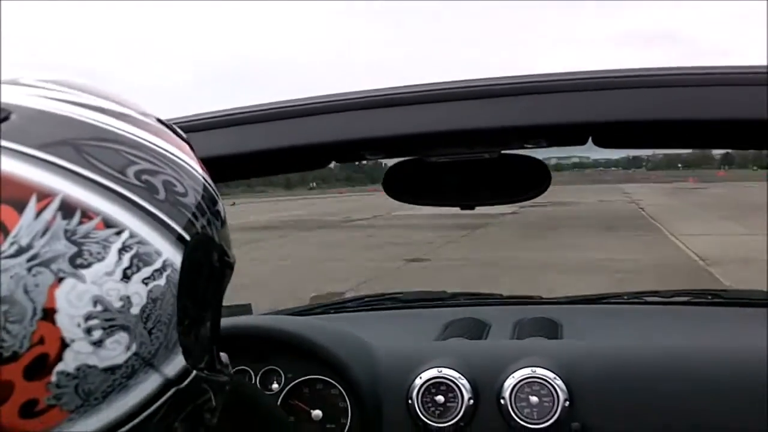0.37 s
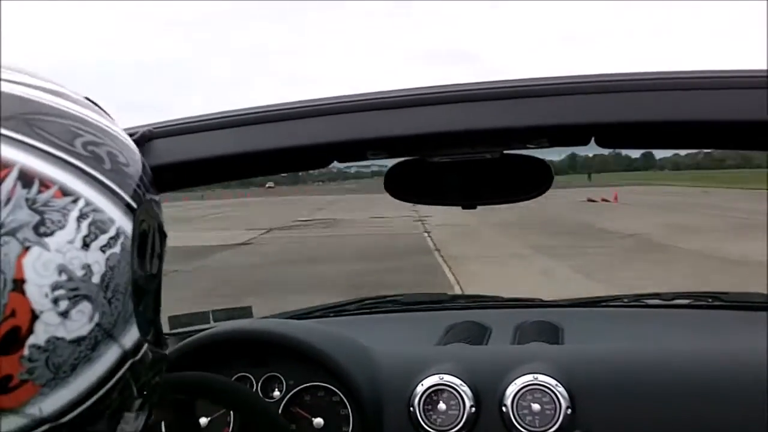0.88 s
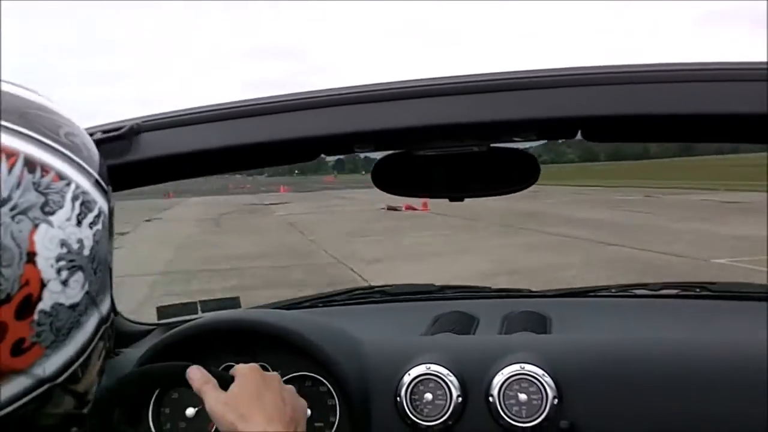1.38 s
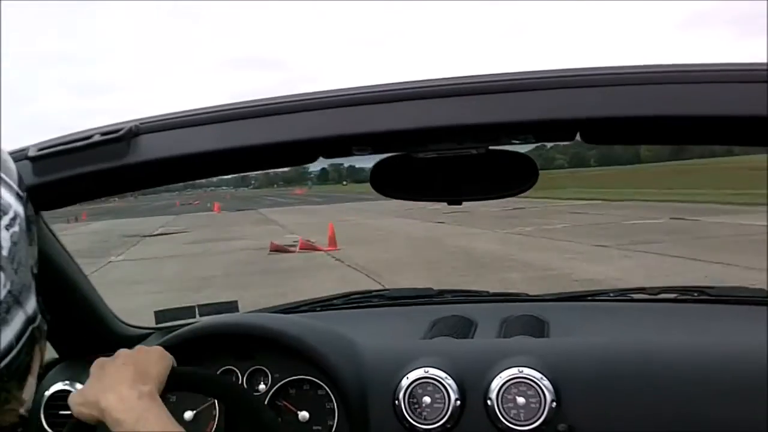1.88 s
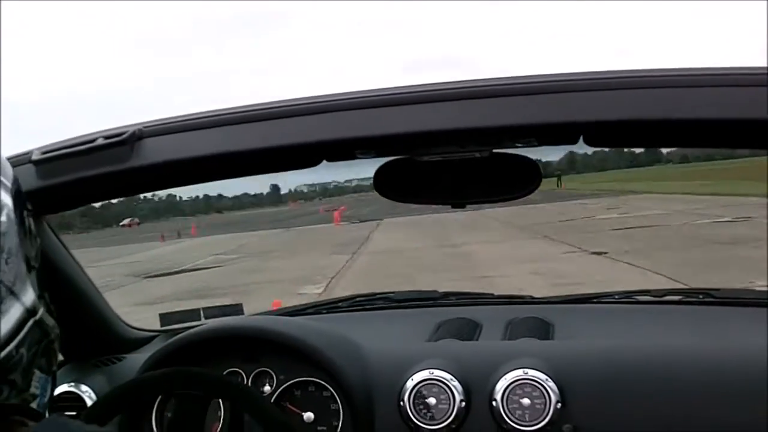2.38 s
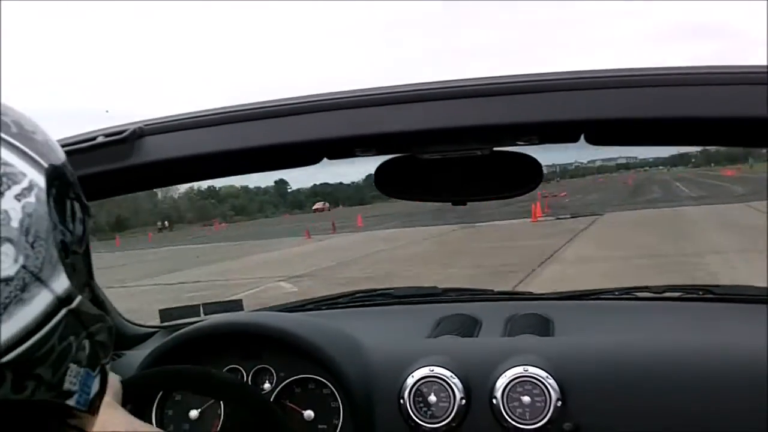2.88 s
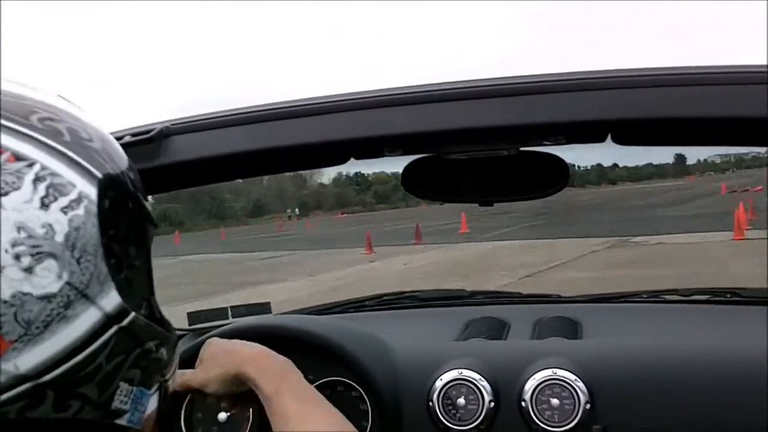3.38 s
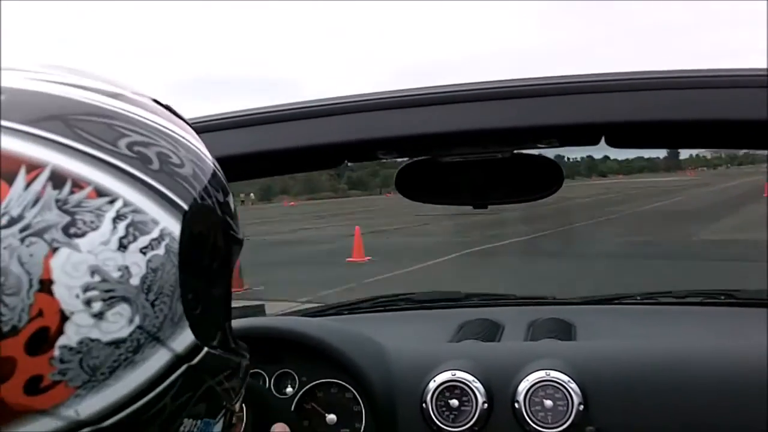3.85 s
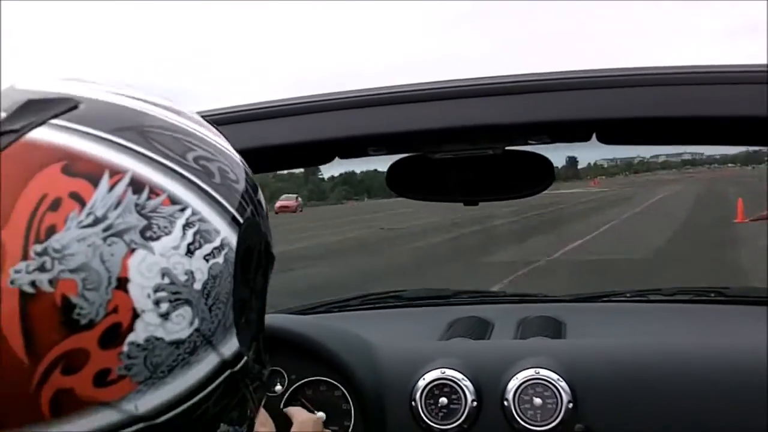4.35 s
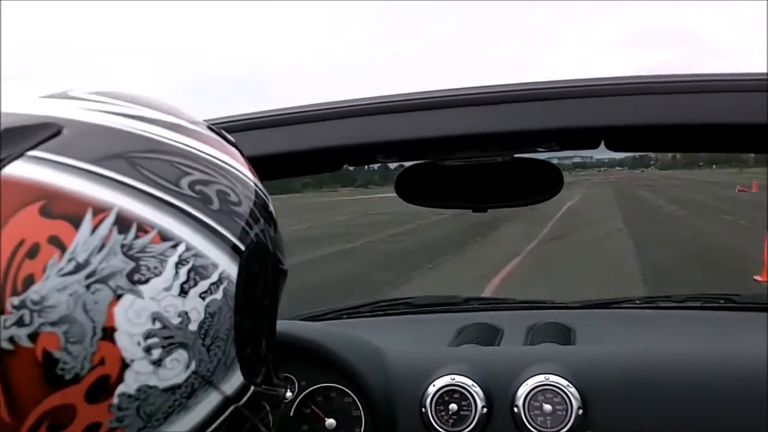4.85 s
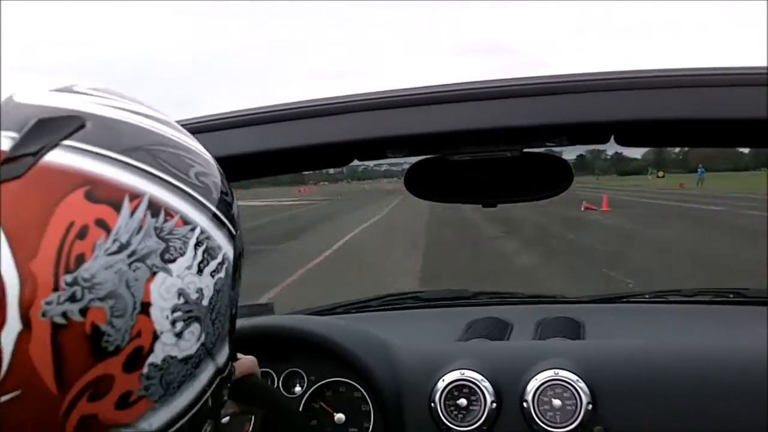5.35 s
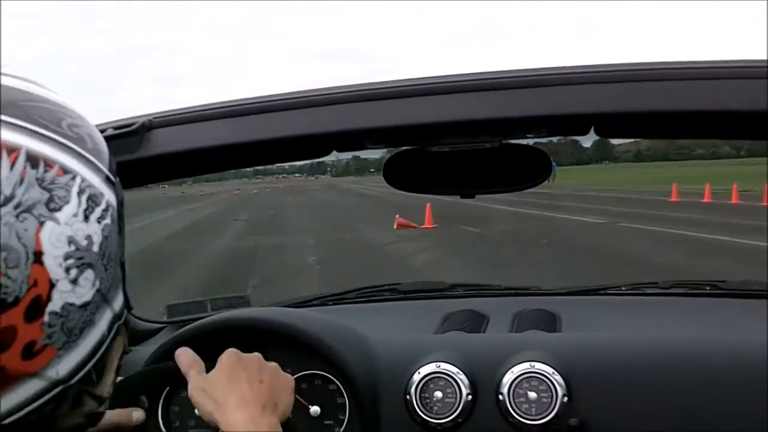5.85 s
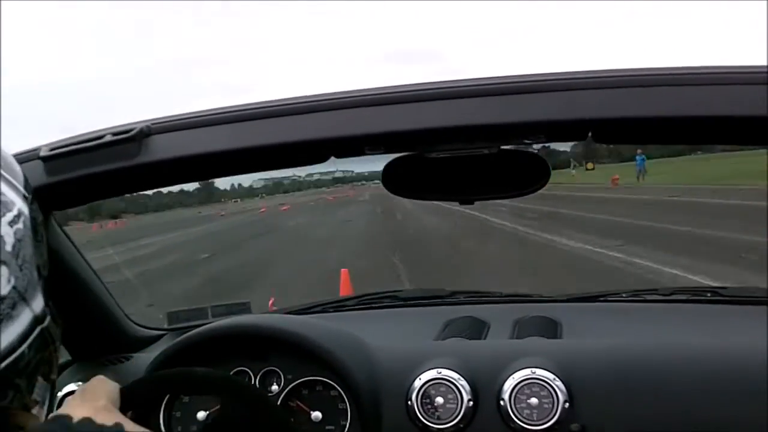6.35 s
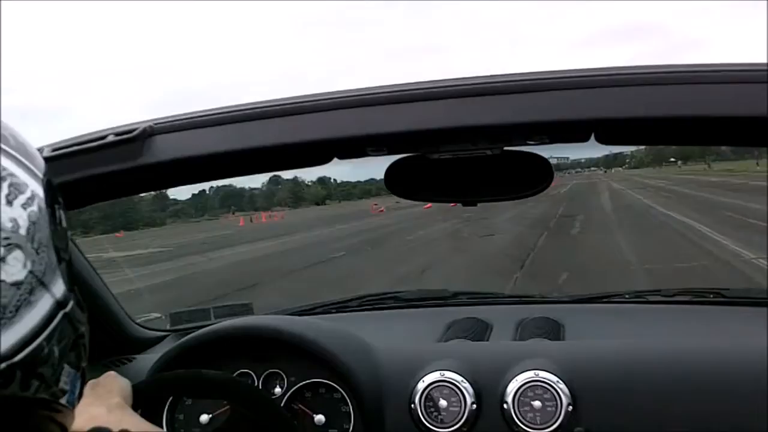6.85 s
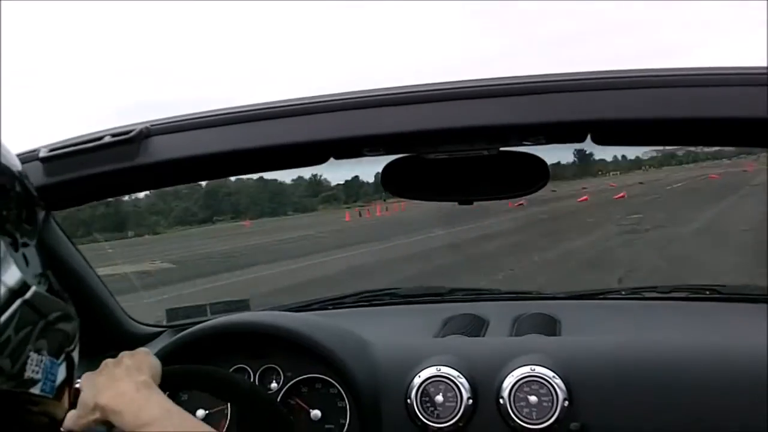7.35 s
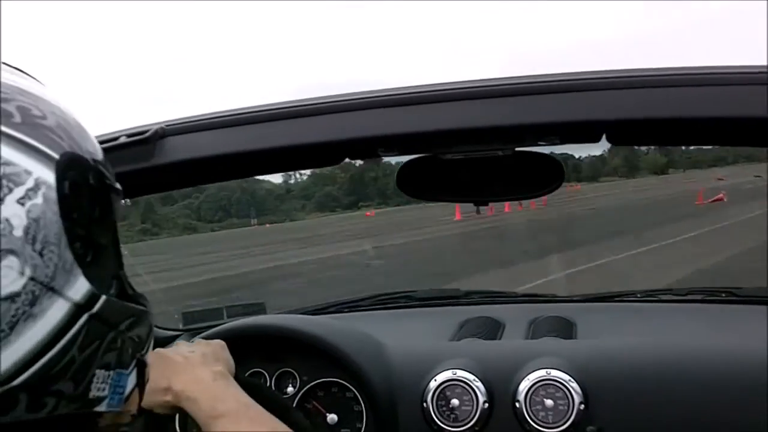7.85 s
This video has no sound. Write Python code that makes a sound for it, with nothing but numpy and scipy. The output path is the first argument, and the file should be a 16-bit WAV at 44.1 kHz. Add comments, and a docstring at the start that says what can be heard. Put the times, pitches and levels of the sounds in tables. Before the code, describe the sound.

Wind rolling over the windscreen of an open car pounds a microphone behind the seats throughout: deep uneven thumps, ragged bursts and dry crackles, over thinner road and intake hiss. A four-cylinder engine drones low beneath, first easing, then pulling from about 0.4 to 1.2 seconds as a faint turbo whistle climbs. At 1.1 to 1.4 the boost vents in a breathy puff with gliding squeaks. The engine sags near 2 seconds, its drone more prominent, with small loose ticks, then climbs from 2.5 to 3.9 with whistle and howl. Another squeaky release follows at 3.9 to 4.3. A strong gust hits at 4.4, with dense crackling until about 5. A short push at 5.5 ends in a brief puff at 5.8. From 6.6 the engine rises again, peaking near 7.7, where sharp chirps and quick hisses vent until 8. Wind continues to the end.

```python
"""Open car driven hard

Inside an open car on a paved course, heard from behind the seats. Air rolling over the windscreen buffets
the microphone: filtered noise makes slow pressure swells, with crackling eddies on their falling side.
Beneath it a four-cylinder engine drones in sine tones and its intake howls; a turbo whistle climbs under load.
Filtered noise and gliding squeaks vent the boost as the throttle lifts; a loose part ticks as short ringing tones."""
import sys
import numpy as np
from scipy import signal
from scipy.fft import rfft, irfft, next_fast_len
from scipy.io import wavfile
from scipy.ndimage import uniform_filter1d

SR = 44100
rng = np.random.default_rng(int(sys.argv[2]) if len(sys.argv) > 2 else 0)


def master(y):
    """Save y as 16-bit WAV."""
    cut = np.clip(np.atleast_2d(y).T, -1, 1)
    pcm = np.round(cut * 32767)  # scale
    wavfile.write(sys.argv[1], SR, pcm.astype(np.int16))


def invert_db(level):
    """Linear amplitude ratio for a level in decibels (20 dB per decade), elementwise."""
    return 10 ** (np.asarray(level, dtype=float) / 20)


N = 362502
TIME = np.arange(N) / SR
CRACKLE_BAND_HZ = (2900, 7000)  # where crackle levels are set


def rms_one(x):
    """Scales a signal to an rms of 1."""
    return x / np.sqrt(np.mean(x ** 2) + 1e-20)


def in_time(rows):
    """Draws straight lines between timed rows, one curve per column."""
    s, *columns = np.transpose(rows)
    return [np.interp(TIME, s, c) for c in columns]


def while_on(rows, fade_s):
    """A gain that opens at the first row and closes at the last."""
    since_start = TIME - rows[0][0]
    until_end = rows[-1][0] - TIME
    return np.clip(np.minimum(since_start, until_end) / fade_s, 0, 1)


def colour(x, points, band=(0, SR)):
    """Filters by a (Hz, dB) spectrum; white noise keeps its rms in the part inside the band."""
    size = next_fast_len(N)
    hz = np.maximum(np.arange(size // 2 + 1) * SR / size, 1)
    point_hz, point_db = np.transpose(points)
    gain = invert_db(np.interp(np.log(hz), np.log(point_hz), point_db, left=-120, right=-120))
    inside = gain * (hz >= band[0]) * (hz <= band[1])
    gain = gain / np.sqrt(np.mean(inside ** 2))
    return irfft(rfft(x, size) * gain, size)[:N]


def drift(rate_hz):
    """Slow random wandering with rms 1: white noise through a two-pole lowpass."""
    r = np.exp(-2 * np.pi * rate_hz / SR)
    noise = rng.standard_normal(N + SR)
    return rms_one(signal.lfilter([1], [1, -2 * r, r * r], noise)[SR:])  # the first second settles the filter


def resonance(x, hz, width_hz):
    """Lets through one band, as a ringing body does."""
    r = np.exp(-np.pi * width_hz / SR)
    poles = [1, -2 * r * np.cos(2 * np.pi * hz / SR), r * r]
    return signal.lfilter([(1 - r * r) / 2, 0, (r * r - 1) / 2], poles, x)


def torn_noise(slow_db, fast_db):
    """White noise torn into lumps and spits; rms 1."""
    lumps = slow_db * np.minimum(drift(19.4), 2)
    spits = fast_db * np.minimum(drift(170), 2.4)
    return rms_one(rng.standard_normal(N) * invert_db(lumps + spits))


# Wind over the cabin, also used by rush() and grit().
# Each row: time in seconds, swell level in dB, level of the small eddies in dB.
WIND_LEVELS = [(0, -16, -32.5), (.5, -12, -37.5), (1, -14, -34), (1.6, -16, -35.5), (2.3, -16, -40.5),
               (2.55, -21, -37.5), (3, -13.5, -39.5), (3.6, -13.5, -35.5), (4.25, -12, -36),
               (4.42, -3, -29.5), (4.9, -12.5, -39), (5.3, -14.5, -38.5), (5.8, -13, -35), (6.6, -14, -38),
               (7.5, -13.5, -36.5), (8.22, -9, -33.5)]
# Tone of the swell. Each row: frequency in Hz, relative level in dB per Hz.
SWELL_SPECTRUM = [(4, -23), (8, -2), (12, -1.5), (20, -1), (40, -10.5), (80, -16), (160, -27.5), (400, -47)]


def swell():
    """Slow pressure swings of the rolling air: low noise arriving in thumps."""
    thumps = invert_db(0.5 * drift(3.4))
    air = colour(torn_noise(slow_db=2.8, fast_db=2.5), SWELL_SPECTRUM)
    return invert_db(in_time(WIND_LEVELS)[0]) * thumps * air


# Body of an eddy, also used by grit() and eddies(). Each row: frequency in Hz, relative level in dB per Hz.
EDDY_SPECTRUM = [(30, -8), (90, -1), (200, -3), (500, -11.5), (1000, -19), (2000, -29), (3000, -33.5),
                 (6000, -50)]
# Treble of an eddy, also used by eddies(). Each row: frequency in Hz, relative level in dB per Hz.
CRACKLE_SPECTRUM = [(1200, -2), (2200, 1), (3500, -3.5), (4800, 3), (6500, -8.5), (9500, -32),
                    (13500, -58.5), (16500, -53)]
# Intake and road hiss, swelling with boost. Each row: time in seconds, level in dB.
HISS_LEVELS = [(0, -73), (.55, -59.5), (1.35, -57.5), (1.9, -65), (2.4, -64), (2.6, -54), (3, -60.5),
               (3.6, -60.5), (3.9, -56.5), (4.38, -60), (4.6, -60.5), (5.2, -76.5), (5.65, -56.5),
               (6.08, -57.5), (6.45, -79.5), (6.84, -56), (7.6, -62), (8.22, -55.5)]
# Tone of that hiss. Each row: frequency in Hz, relative level in dB per Hz.
HISS_SPECTRUM = [(500, -13), (1500, -12), (3500, -4.5), (4800, 1.5), (6500, -5.5), (9500, -17.5),
                 (13500, -25), (16500, -33.5)]


def rush(swelling):
    """Countless small eddies, thicker on the falling side of the swell, over a smoother intake and road hiss."""
    smooth = uniform_filter1d(swelling, size=441)
    falling = -rms_one(uniform_filter1d(np.gradient(smooth), size=441))
    small_db = in_time(WIND_LEVELS)[1] + 2 * np.clip(falling, -2, 2)
    small = torn_noise(slow_db=5.0, fast_db=4.5) * invert_db(small_db)
    air = torn_noise(slow_db=2.5, fast_db=1.5) * invert_db(in_time(HISS_LEVELS)[0])
    body = colour(small, EDDY_SPECTRUM, band=(250, 1500))
    spray = invert_db(-32.5) * colour(small, CRACKLE_SPECTRUM, CRACKLE_BAND_HZ)
    return body + spray + colour(air, HISS_SPECTRUM, band=(5800, 10500))


# Engine speed and loudness. Each row: time in seconds, firing rate in Hz, level of the firing tones in dB,
# level of the tone at half that rate in dB.
ENGINE_COURSE = [(0, 180.8, -23, -37), (.18, 168.7, -31, -42), (.35, 172.4, -55, -40),
                 (.6, 180, -30, -38.5), (1.05, 188.8, -30.5, -50), (1.3, 187, -35.5, -48),
                 (1.6, 182.8, -31, -40), (1.97, 165, -22.5, -34.5), (2.05, 163.7, -27.5, -36),
                 (2.18, 171, -24.5, -23.5), (2.25, 172.5, -35, -17), (2.35, 166.1, -36.5, -42),
                 (2.6, 168, -31.5, -39), (3.2, 182.1, -29.5, -52.5), (3.9, 207.4, -30, -32.5),
                 (4.05, 204, -43, -32.5), (4.5, 200.9, -29, -43.5), (5.1, 191.1, -31.5, -46.5),
                 (5.55, 186.7, -42.5, -31.5), (5.95, 190.4, -44.5, -44), (6.1, 186, -25, -39),
                 (6.4, 177.8, -25.5, -50), (6.55, 181.1, -39, -34.5), (7.1, 190.8, -33, -44),
                 (7.7, 209.2, -33, -42), (7.85, 203.8, -46, -41.5), (8.22, 194.3, -34, -33.5)]
# Tones of the firing. Each row: multiple of the firing rate, level relative to the firing tones in dB.
FIRING_ORDERS = [(1, -1.5), (2, -21), (3, -29)]
ROAR_OPEN_DB, ROAR_SHUT_DB = -47.5, -61.5  # howl at a 190 Hz firing rate, throttle open and shut
ROAR_DB_PER_HZ = 0.28  # the howl grows with firing rate
INTAKE_HZ, INTAKE_WANDER_HZ = 820, 24  # pitch of the intake pipe; rate at which its howl wanders


def engine():
    """Low multiples of the firing rate, and a thin howl at the intake pipe's own pitch."""
    firing_hz, firing_db, half_db = in_time(ENGINE_COURSE)
    turn = 2 * np.pi * np.cumsum(firing_hz * (1 + 0.008 * drift(13.9))) / SR  # slightly uneven speed
    tones = np.zeros(N)
    for multiple, db in FIRING_ORDERS:
        uneven_db = 5.5 * np.minimum(drift(24), 1.3)
        tones += invert_db(db + uneven_db) * np.sqrt(2) * np.sin(multiple * turn)
    half_tone = invert_db(half_db + 2.0 * drift(15.0)) * np.sin(turn / 2)
    throttle = sum(while_on(rows, fade_s=0.13) for rows in TURBO_CLIMBS)
    roar_db = ROAR_SHUT_DB + (ROAR_OPEN_DB - ROAR_SHUT_DB) * throttle + ROAR_DB_PER_HZ * (firing_hz - 190)
    pipe = 2 * np.pi * INTAKE_HZ * TIME
    howl = drift(INTAKE_WANDER_HZ) * np.sin(pipe) + drift(INTAKE_WANDER_HZ) * np.cos(pipe)
    return invert_db(firing_db) * tones + half_tone + invert_db(roar_db) * howl


GRIT_PER_S, GRIT_DB, GRIT_SPREAD_DB = 220, -5, 3.8  # average rate; rms against small eddies; unevenness


def grit():
    """Tiny lone snaps at random, following the level of the small eddies."""
    born = rng.random(N) < GRIT_PER_S / SR
    sizes = invert_db(GRIT_SPREAD_DB * np.minimum(rng.exponential(1, N), 4)) * rng.choice([-1, 1], N)
    crisp = rms_one(colour(born * sizes, EDDY_SPECTRUM[3:]))  # 500 Hz and up
    return invert_db(GRIT_DB + in_time(WIND_LEVELS)[1]) * crisp


# Big eddies on the microphone. Each row: time in seconds, nominal peak in dB,
# treble relative to the body in dB, length in seconds.
BIG_EDDIES = [(.026, -10.5, -11.5, 0.016), (.169, -23.5, -7, 0.015), (.277, -19, -18.5, 0.024),
              (.49, -19, -38, 0.027), (.588, -21.5, -11, 0.014), (.616, -22.5, -3.5, 0.019),
              (.682, -26, -16, 0.023), (.908, -12, -6.5, 0.033), (.972, -16.5, -17.5, 0.0023),
              (1.03, -29.5, -24, 0.072), (1.2, -25.5, -25, .01), (1.25, -13.5, -4.5, 0.014),
              (1.402, -16, -32, 0.0051), (1.435, -19.5, -3, 0.038), (1.503, -13.5, 1, 0.021),
              (1.561, -22.5, -17.5, 0.016), (1.611, -13, -16.5, 0.024), (1.847, -20.5, -34, 0.0063),
              (1.891, -21, -23.5, 0.023), (1.995, -19.5, -25.5, 0.01), (2.141, -18, -49, 0.0033),
              (2.304, -19, -26.5, 0.021), (2.235, -21, -23.5, 0.026), (2.448, -23, -20, 0.01),
              (2.596, -16.5, -31.5, 0.013), (2.634, -18, -23, 0.01), (2.695, -23, -27, 0.038),
              (2.776, -28, -17, 0.0068), (2.862, -37, -20.5, 0.017), (2.941, -24.5, -16, 0.015),
              (2.98, -32, -8.5, 0.01), (3.06, -30.5, -0.5, 0.0043), (3.161, -16, -17, 0.017),
              (3.203, -20.5, -20, 0.022), (3.241, -19, -2, 0.0031), (3.281, -14, -23, 0.018),
              (3.387, -16, -15.5, 0.022), (3.545, -18.5, -20, 0.013), (3.606, -18.5, -38, 0.012),
              (3.677, -17, -17, 0.016), (3.715, -17.5, -20.5, 0.0055), (3.952, -19.5, -20, 0.0062),
              (4.034, -17, -20.5, 0.016), (4.164, -20, -15, 0.02), (4.358, -21, -4, 0.026),
              (4.403, -10, 0.5, 0.022), (4.422, -26.5, -9, 0.0075), (4.456, -37, -5, 0.0056),
              (4.472, -26, 4.5, 0.0071), (4.516, -17, -2.5, 0.041), (4.576, -11, -18, 0.009),
              (4.608, -27, -8.5, 0.0031), (4.651, -13.5, -3, 0.011), (4.748, -14, 0.5, 0.029),
              (4.795, -29.5, -12, 0.013), (4.817, -17.5, -4, 0.015), (4.873, -22.5, 0.5, 0.0045),
              (4.899, -10.5, -18.5, 0.017), (5.004, -15, -13, 0.025), (5.091, -26.5, -33, 0.039),
              (5.12, -22.5, -4.5, 0.0065), (5.185, -17.5, -8.5, 0.02), (5.21, -27, 0.5, 0.015),
              (5.236, -20, -8, 0.0078), (5.304, -19.5, -24.5, 0.03), (5.351, -18, -13.5, 0.063),
              (5.456, -17, -16, 0.025), (5.503, -10.5, -19, 0.0032), (5.552, -16.5, -22, 0.0055),
              (5.654, -16.5, -13, 0.012), (5.771, -17, -9, 0.045), (5.891, -17, 0.5, 0.009),
              (5.994, -17, -0.5, 0.017), (6.029, -17.5, -18, 0.006), (6.156, -17, -10.5, 0.026),
              (6.184, -20, -3.5, 0.034), (6.263, -14, -21.5, 0.015), (6.28, -29.5, -7, 0.0041),
              (6.3, -18.5, -15.5, 0.0066), (6.322, -21, -14, 0.028), (6.352, -28.5, -6.5, 0.026),
              (6.384, -18, -12, 0.0054), (6.425, -26.5, -4.5, 0.006), (6.458, -16.5, -24, 0.023),
              (6.52, -26.5, -16.5, 0.011), (6.551, -20, -26, 0.021), (6.663, -21.5, -20, 0.058),
              (6.914, -16, -5, 0.034), (7.083, -14.5, -19.5, 0.021), (7.36, -20, -15, 0.02),
              (7.443, -13, -9, 0.019), (7.505, -17.5, -39.5, 0.023), (7.612, -19.5, -8, 0.0067),
              (7.673, -20, -15, 0.014), (7.78, -13, -22, 0.012), (7.984, -26.5, -15, 0.018),
              (7.998, -22, -11, 0.0087), (8.06, -23, -6, 0.014), (8.091, -14.5, -7.5, 0.028),
              (8.157, -14, -13, 0.01)]


def eddy_rows():
    """The big eddies, and lesser ones scattered at random, 4.6 a second on average."""
    slots_per_s = 20
    lesser = []
    for k, (chance, u, v, w) in enumerate(rng.random((round(N / SR * slots_per_s), 4))):
        if chance < 4.6 / slots_per_s and k / slots_per_s + .06 < N / SR:
            lesser.append(((k + u) / slots_per_s, -26.5 + 30 * (v - .5), -33.5 + 24 * (w - .5), 0.0096))
    return list(BIG_EDDIES) + lesser


# Top octave of the hardest eddies, also used by snaps(). Each row: frequency in Hz, relative level in dB per Hz.
FIZZ_SPECTRUM = [(7000, 2), (10000, 1.5), (12500, -9.5), (16000, -15)]
EDDY_CREST_DB = 13.5  # nominal peak over rms of a burst
SWING_DB, SWING_FOLLOWS = -14.5, .55  # pressure swing under a -17.5 dB eddy; its growth in dB per dB
FIZZ_DB, FIZZ_FOLLOWS = -38, 2.5  # nominal fizz peak at -14 dB of treble; its growth in dB per dB
COLLAPSE_SHARE = 0.36  # how far into its length an eddy's pressure collapses


def eddies(rows):
    """Each eddy is a burst of torn noise riding a swing from high to low pressure; its treble comes in spits."""
    body, crackle, fizz, swing = np.zeros((4, N))
    torn = torn_noise(slow_db=5.0, fast_db=3.5)
    tearing = drift(180)
    spit, spray = torn * invert_db(2.1 * tearing), torn * invert_db(7.4 * tearing)
    for s, peak_db, treble_db, length in rows:
        near = slice(max(round((s - .08) * SR), 0), round((s + .12) * SR))
        since = TIME[near] - s
        shape = np.where(since < 0, np.exp(since / 0.0042), np.exp(-(since / length) ** 4))
        # dividing by the norm keeps the burst's energy whatever the tearing does
        size = invert_db(peak_db - EDDY_CREST_DB) * np.linalg.norm(shape)
        spit_burst = shape * spit[near]
        spit_burst = size * spit_burst / np.linalg.norm(spit_burst)
        spray_burst = shape * spray[near]
        spray_burst = size * spray_burst / np.linalg.norm(spray_burst)
        fizz_db = FIZZ_DB + FIZZ_FOLLOWS * (peak_db + treble_db + 14)
        body[near] += spit_burst
        crackle[near] += invert_db(treble_db) * spray_burst
        fizz[near] += invert_db(fizz_db - peak_db) * spray_burst
        # slow build, quick collapse
        since = since - COLLAPSE_SHARE * length
        swing_db = SWING_DB + SWING_FOLLOWS * (peak_db + 17.5)
        swing[near] -= invert_db(swing_db) * np.tanh(since / 0.0028) * np.exp(-(since / 0.02) ** 2)
    body = colour(body, EDDY_SPECTRUM, band=(700, 5000))
    crackle = colour(crackle, CRACKLE_SPECTRUM, CRACKLE_BAND_HZ)
    return body + crackle + colour(fizz, FIZZ_SPECTRUM) + swing


# Sharpest spits of the eddies. Each row: start in seconds, nominal treble peak in dB,
# top octave relative to that peak in dB.
SHARP_SPITS = [(0.0992, -27.5, -37.5), (0.17, -30.5, -39), (0.5838, -26, -43), (0.6192, -24, -44),
               (0.682, -14.5, -44.5), (0.691, -18.5, -29.5), (0.902, -23.5, -29.5), (0.9098, -15.5, -31.5),
               (0.9154, -25.5, -40), (0.9257, -23.5, -36.5), (0.9688, -26, -43), (1.0276, -32, -28),
               (1.2528, -26.5, -33.5), (1.4398, -27.5, -41.5), (1.5032, -32.5, -32), (1.509, -25, -31),
               (1.6053, -25, -32), (1.892, -33.5, -34), (1.991, -32, -39), (2.4494, -42, -20),
               (2.9473, -26.5, -47), (2.982, -30.5, -41), (3.0576, -33, -46), (3.1664, -35, -37),
               (3.209, -27.5, -28.5), (3.244, -33, -35), (3.3894, -32.5, -23.5), (3.4073, -24.5, -35),
               (3.6082, -35.5, -29), (3.681, -23.5, -31), (3.7138, -28.5, -30), (3.8028, -31, -36),
               (4.035, -25.5, -19.5), (4.3562, -19, -40), (4.4049, -31, -26), (4.4114, -20, -18),
               (4.4218, -23.5, -23.5), (4.4596, -26, -39), (4.5174, -22.5, -29), (4.5439, -18.5, -33.5),
               (4.5777, -26.5, -42), (4.6537, -16.5, -39.5), (4.755, -31, -32), (4.7665, -36.5, -23.5),
               (4.7938, -26, -44), (4.806, -26.5, -45), (4.8253, -27.5, -39), (4.879, -29.5, -41),
               (4.9005, -30.5, -32), (5.0016, -22, -37), (5.0904, -43, -35), (5.1205, -29.5, -47),
               (5.1827, -34, -32), (5.1961, -23, -39), (5.2087, -22.5, -39.5), (5.2217, -25.5, -38),
               (5.3683, -32, -44), (5.455, -45.5, -23), (5.4668, -31.5, -43), (5.5515, -20.5, -42),
               (5.6643, -26.5, -28), (5.7743, -21, -36.5), (5.8915, -36, -19.5), (5.994, -31, -36),
               (6.0288, -27.5, -43), (6.1566, -20, -39.5), (6.1913, -22, -39.5), (6.264, -17, -37),
               (6.2791, -31.5, -42), (6.3011, -35.5, -47), (6.3669, -27.5, -47), (6.383, -38.5, -40.5),
               (6.5172, -37.5, -43), (6.6636, -25, -49), (6.9163, -15.5, -49), (6.923, -30, -43),
               (7.0843, -29.5, -34), (7.3642, -27, -30), (7.442, -25.5, -42), (7.509, -35, -38),
               (7.7846, -27.5, -34), (8.095, -25, -39)]
# Tone of the spits. Each row: frequency in Hz, relative level in dB per Hz.
SNAP_SPECTRUM = [(150, -14.5), (600, 8.5), (2000, 1.5), (4500, -3.5), (6500, -18), (9500, -43.5),
                 (13500, -58.5), (16500, -49)]
SNAP_DB, SNAP_TOP_DB = 5, 11  # peak of the white grain over its treble peak, and over its top octave


def snaps():
    """The sharpest spits: each about a millisecond of noise."""
    cracks, tops = np.zeros((2, N + SR))
    length = 176  # samples
    envelope = np.exp(-np.abs(np.arange(length) / SR - .0012) / .0009)
    for s, peak_db, top_db in SHARP_SPITS:
        grain = rng.standard_normal(length) * envelope
        grain = grain / np.max(np.abs(grain))
        at = round(s * SR)
        cracks[at:at + length] += invert_db(peak_db + SNAP_DB) * grain
        tops[at:at + length] += invert_db(peak_db + top_db + SNAP_TOP_DB) * grain
    return colour(cracks[:N], SNAP_SPECTRUM, CRACKLE_BAND_HZ) + colour(tops[:N], FIZZ_SPECTRUM)


# Sharp jolts of pressure that knock the loose part. Each row: start in seconds, nominal tick level in dB.
PRESSURE_JOLTS = [(0.131, -60.5), (0.15, -57), (0.2792, -54.5), (0.4262, -54.5), (0.5022, -57),
                  (0.591, -56.5), (0.8835, -53.5), (1.736, -55.5), (1.848, -59), (1.8975, -61),
                  (1.971, -53), (1.975, -56), (2.1123, -60), (2.1753, -54), (2.2382, -54.5),
                  (2.2547, -54.5), (2.3456, -51.5), (2.7481, -60.5), (2.8667, -50.5), (3.0954, -54),
                  (3.4026, -54.5), (3.565, -62), (4.304, -53), (4.3335, -53), (4.9897, -61), (5.458, -56),
                  (5.666, -50), (5.702, -55.5), (6.895, -58.5), (7.6, -59.5)]
# Ringing of the loose part. Each row: frequency in Hz, level in dB, time to fade by 60 dB in seconds.
LOOSE_PART_MODES = [(6850, -6, .009), (9600, -2.5, .009), (12050, -3, .009), (14450, -3, .009)]
JOLT_DB, JOLT_S, STRIKE_DB = -13, 0.0016, 7.5  # pressure peak, its half width, strike over the tick level
FAINT_DB, FAINT_SPREAD_DB = -66, 4  # strikes at other crests


def rattle(pressure):
    """A loose part clicks at each jolt, and faintly at crests of pressure, ringing its short modes."""
    clicks, jolts, ticks = np.full(N, 1e-18), np.zeros(N), np.zeros(N)
    slow = uniform_filter1d(pressure, size=60) - uniform_filter1d(pressure, size=800)
    crests = signal.find_peaks(slow, height=0.18, prominence=.1, distance=600)[0]
    clicks[crests] = invert_db(FAINT_DB + FAINT_SPREAD_DB * rng.standard_normal(len(crests)))
    for s, db in PRESSURE_JOLTS:
        middle = s + JOLT_S / 2
        clicks[round(middle * SR)] = invert_db(db + STRIKE_DB)
        jolts += invert_db(JOLT_DB) * np.exp(-((TIME - middle) / JOLT_S) ** 2)
    for hz, level_db, t60 in LOOSE_PART_MODES:
        r = invert_db(-60 / (t60 * SR))
        w = 2 * np.pi * hz / SR
        ticks += invert_db(level_db) * signal.lfilter([0, np.sin(w)], [1, -2 * r * np.cos(w), r * r], clicks)
    return ticks + jolts


# Turbo spool-ups while the throttle is open, also used by engine(); one list for each.
# Each row: time in seconds, whistle pitch in Hz.
TURBO_CLIMBS = [
    [(.4, 6000), (.6, 9140), (.8, 11300), (.95, 12700), (1.08, 13250), (1.25, 12600)],
    [(2.5, 6560), (2.7, 9300), (2.9, 11700), (3.1, 13400), (3.3, 13800), (3.5, 13600), (3.95, 12800)],
    [(5.44, 6500), (5.55, 8150), (5.62, 10000), (5.7, 10900), (5.76, 11310), (5.83, 11950)],
    [(6.6, 6400), (6.8, 9100), (7, 11600), (7.2, 13400), (7.45, 14200), (7.65, 14150), (7.82, 13100)],
]
# Loudness of the whistle by pitch. Each row: pitch in Hz, level in dB.
WHISTLE_LEVELS = [(6000, -62), (9000, -68), (11500, -69), (14000, -75)]


def turbo():
    """A thin ragged whistle at shaft speed that climbs while the throttle is open."""
    out = np.zeros(N)
    for rows in TURBO_CLIMBS:
        hz = uniform_filter1d(in_time(rows)[0], size=SR // 16)  # the heavy wheel changes speed smoothly
        turn = 2 * np.pi * np.cumsum(hz + 75 * drift(80)) / SR
        ragged_db = 5 * np.minimum(drift(35), 1.2)
        level_db = np.interp(hz, *np.transpose(WHISTLE_LEVELS)) + ragged_db
        out += while_on(rows, fade_s=0.036) * invert_db(level_db) * np.sqrt(2) * np.sin(turn)
    return out


# Puffs of boost through the valve. Each row: start in seconds, level in dB, length in seconds.
VENT_PUFFS = [(1.118, -37.5, 0.14), (1.335, -43.5, 0.078), (3.87, -43, 0.1), (4.007, -44.5, .32),
              (5.824, -38, 0.061), (7.727, -42, 0.081), (7.831, -33.5, 0.025), (7.944, -37, 0.032)]
# Tone of the jet. Each row: frequency in Hz, nominal width in Hz, relative level in dB.
PIPEWORK_TONES = [(2350, 280, 14), (3450, 280, 10.5), (4250, 1230, 16), (6500, 1600, -36),
                  (9400, 1800, -36)]
# Squeaks of the fluttering valve. Each row: start in seconds, level at its loudest in dB, length in seconds,
# start pitch in Hz, end pitch in Hz.
VALVE_SQUEAKS = [(1.076, -39, 0.0456, 2350, 2480), (1.12, -37, 0.019, 2500, 2100),
                 (1.137, -31, 0.025, 2080, 2750), (1.191, -38, 0.013, 2350, 2000),
                 (1.203, -41, 0.021, 2080, 2480), (3.866, -41, 0.048, 2050, 2290),
                 (3.91, -37, 0.029, 2110, 2200), (3.938, -33, 0.026, 2397, 2560),
                 (7.735, -30.5, 0.018, 2390, 2350), (7.802, -27, 0.014, 2460, 2500)]
VENT_ATTACK_S, VENT_RELEASE_S = 0.0092, 0.011
SQUEAK_WANDER_HZ, SQUEAK_OCTAVE_DB = 110, -10  # rate of the roughness; octave against the main tone


def vent():
    """A jet of air through the valve and its pipework, with rough gliding squeaks while the valve flutters."""
    flow = np.zeros(N)
    for s, db, length in VENT_PUFFS:
        rise = (TIME - s) / VENT_ATTACK_S
        fall = (s + length - TIME) / VENT_RELEASE_S
        flow += invert_db(db) * np.exp(np.minimum(0, np.minimum(rise, fall)))
    jet = torn_noise(slow_db=1.5, fast_db=2.0)
    hiss = np.zeros(N)
    for hz, width, db in PIPEWORK_TONES:
        once = resonance(jet, hz, 2 * width)
        hiss += invert_db(db) * rms_one(resonance(once, hz, 2 * width))
    out = flow * rms_one(hiss)
    rasp_sin, rasp_cos = drift(SQUEAK_WANDER_HZ), drift(SQUEAK_WANDER_HZ)
    for s, level_db, length, start_hz, end_hz in VALVE_SQUEAKS:
        glide_hz = np.interp(TIME, [s, s + length], [start_hz, end_hz])
        turn = 2 * np.pi * np.cumsum(glide_hz) / SR
        opening = np.exp(-((TIME - s - length / 2) / (length / 2)) ** 4)
        for k, db in ((1, 0), (2, SQUEAK_OCTAVE_DB)):
            tone = rasp_sin * np.sin(k * turn) + rasp_cos * np.cos(k * turn)
            out += invert_db(level_db + db) * opening * tone
    return out


def scene():
    """Adds wind, engine, turbo, valve and loose part; wind and engine pressure stirs the loose part."""
    swelling = swell()
    wind = swelling + rush(swelling) + grit() + eddies(eddy_rows()) + snaps()
    pressure = wind + engine()
    return (pressure + rattle(pressure) + turbo() + vent())[None]


def band_limit(x):
    """A steep low-pass at the top of the band."""
    return signal.sosfilt(signal.butter(12, 15700, fs=SR, output="sos"), x)


# Bands cancelled by the housing. Each row: frequency in Hz, width in Hz, depth from 0 to 1.
HOUSING_BANDS = [(2656, 1040, 0.94), (5360, 2200, 1), (7800, 3000, 1), (10950, 1200, 1)]


def record(dry):
    """The housing before the microphone cancels spaced bands; slowest swings leak away, loud ones are rounded."""
    x = signal.sosfilt(signal.butter(1, 3, "high", fs=SR, output="sos"), dry)
    for hz, width_hz, depth in HOUSING_BANDS:
        x = x - depth * resonance(x, hz, width_hz)
    mix = 1.113 * np.tanh(x / 1.229)
    return band_limit(mix)


dry = scene()
out = record(dry)
master(out)
```